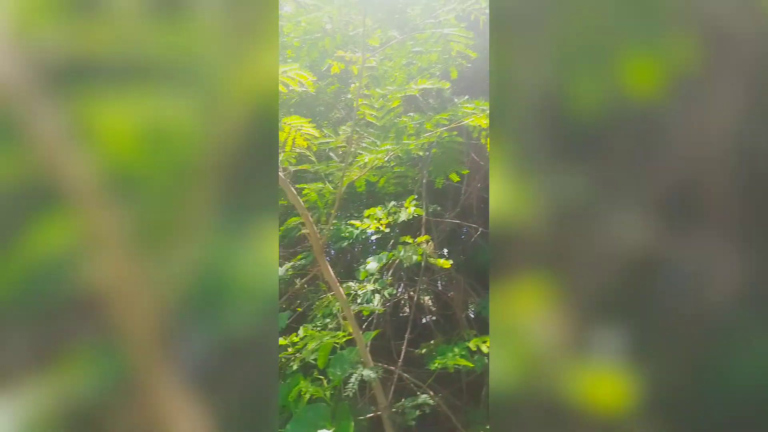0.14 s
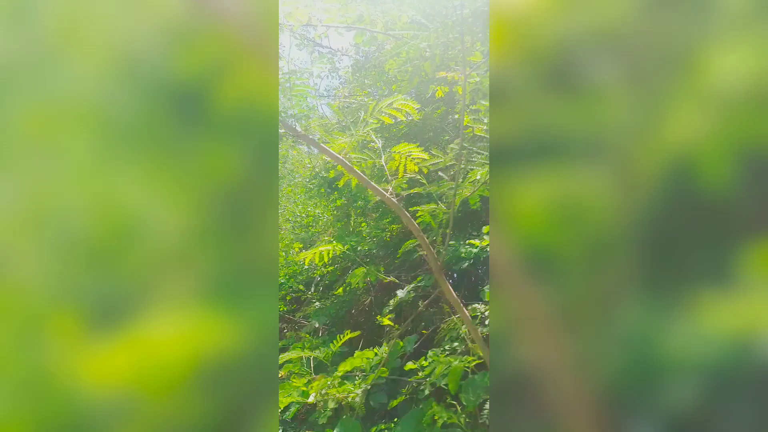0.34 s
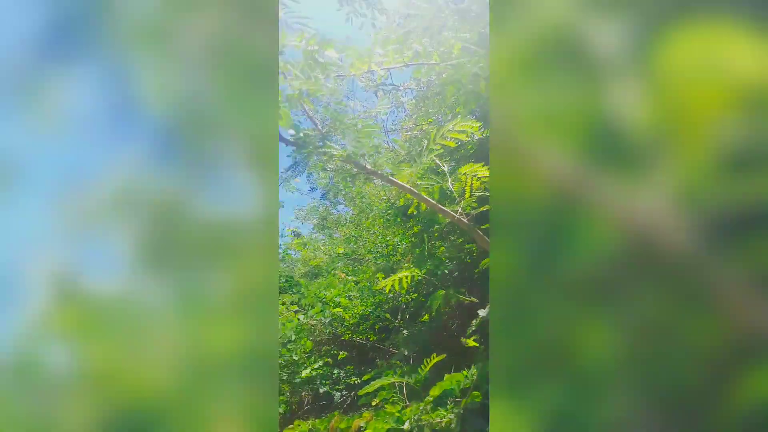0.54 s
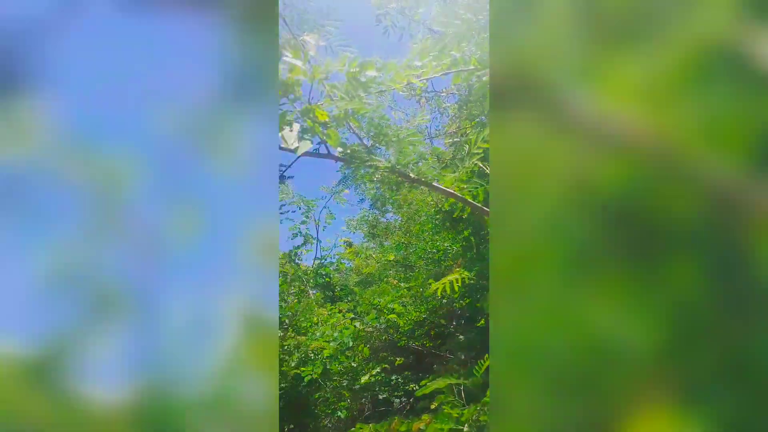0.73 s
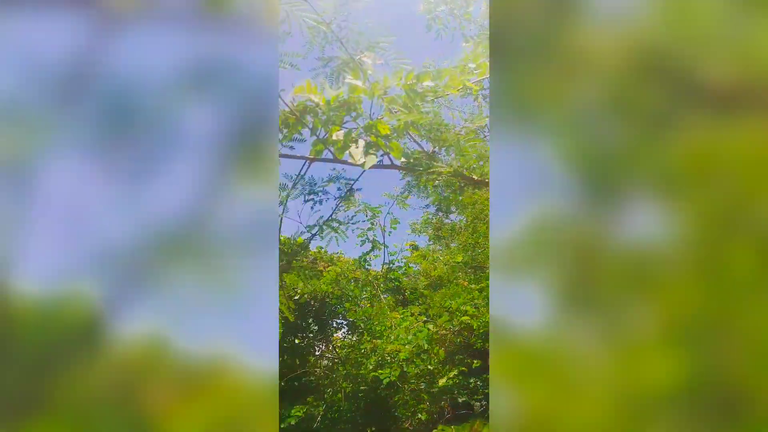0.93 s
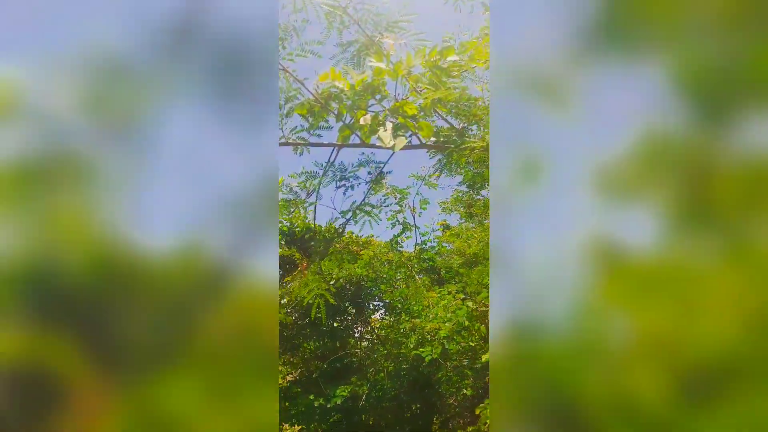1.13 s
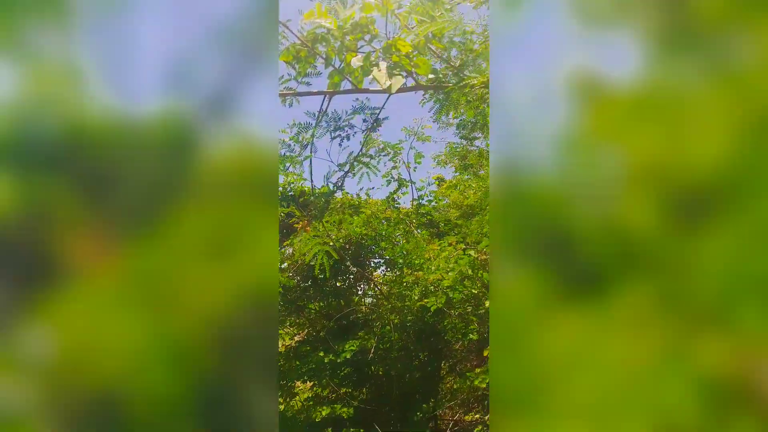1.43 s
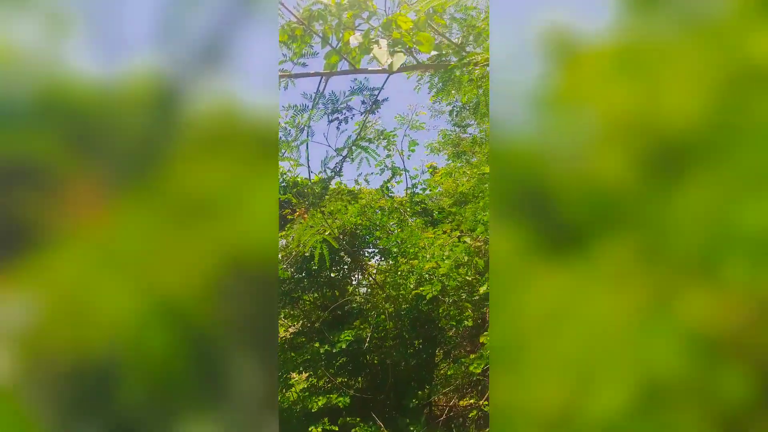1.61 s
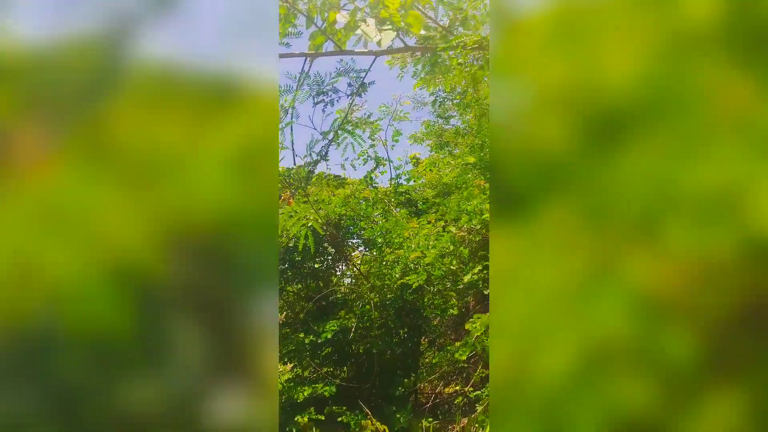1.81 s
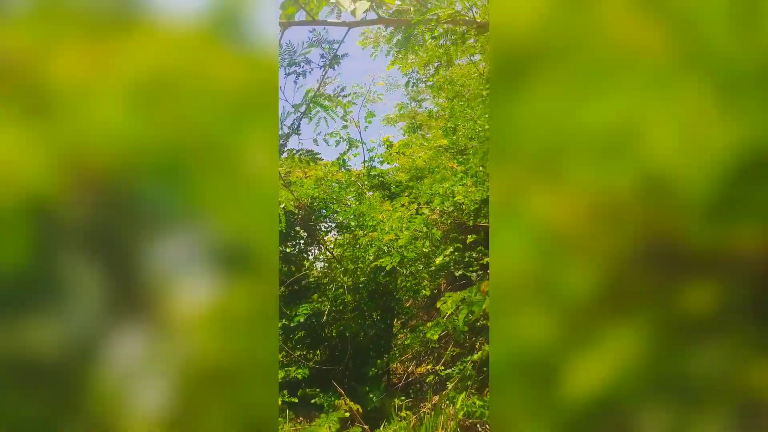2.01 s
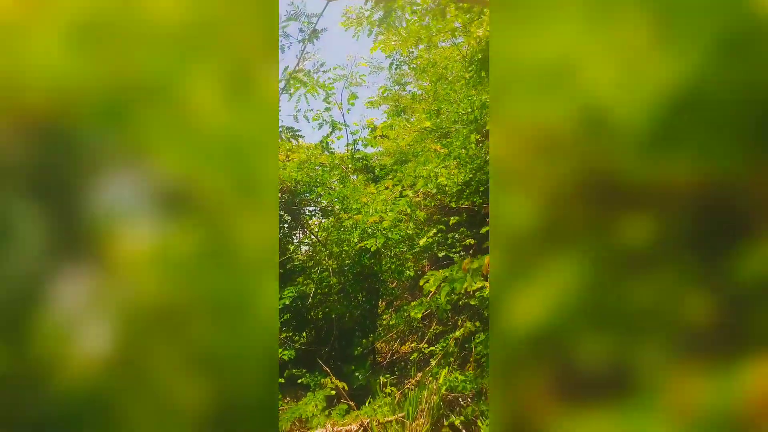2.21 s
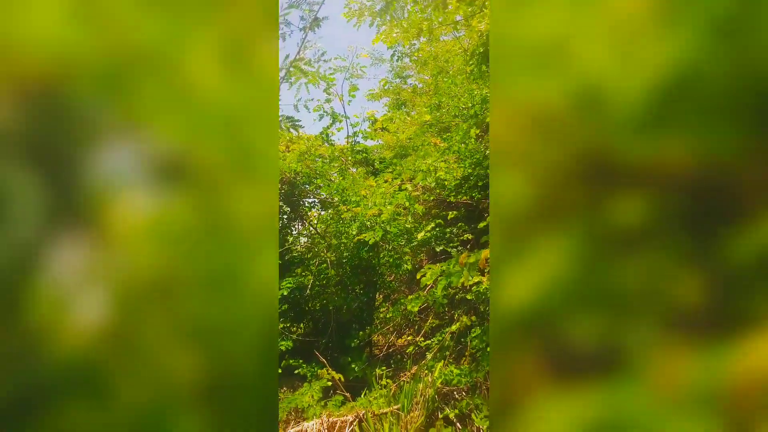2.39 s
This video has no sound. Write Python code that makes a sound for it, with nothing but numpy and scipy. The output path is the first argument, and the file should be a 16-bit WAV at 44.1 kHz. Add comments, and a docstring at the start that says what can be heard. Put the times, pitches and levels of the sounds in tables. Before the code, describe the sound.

Dry leaves rustle close by, faint at first, swelling from 0.2 seconds with bright, crackly sweeps until about 0.7. Twigs snap and knock woodenly from 0.4, sharpest around 0.55-0.65 and 0.8-0.85, again near 1.0. A softer, woodier rustle drags until 1.3. Thin leaf ticks scatter from 1.4 to 2.2, then only faint low traffic rumble remains. Dry, outdoors, almost mono.

```python
"""In dry brush, someone pushes through: leaves rustle in a few sweeps, twigs and leaves snap; far traffic behind.
Rustle is banded leaf-coloured noise plus dense crackle grains; snaps are short noise cracks with a weak rattle,
and twigs also ring in three decaying sine modes. Traffic is coloured noise under three engine orders.
The two channels are nearly one, differing a little in colour."""
import sys
import numpy as np
from scipy import signal
from scipy.fft import rfft, irfft, next_fast_len
from scipy.io import wavfile
from scipy.ndimage import uniform_filter1d, map_coordinates

SR = 44100
rng = np.random.default_rng(int(sys.argv[2]) if len(sys.argv) > 2 else 0)


def digitize_waveform(pressure):
    """Quantize a signal to 16-bit integers and store it at the path in sys.argv[1].

    Rows of a 2-D input are taken as channels; values are limited to [-1, 1].
    """
    field = np.atleast_2d(pressure).T
    bounded = np.clip(field, -1, 1)
    quanta = np.round(bounded * 32767).astype(np.int16)
    wavfile.write(sys.argv[1], SR, quanta)


N = 112454

# Leaf noise bands, lowest to top: low edge f/Hz, high edge f/Hz
BANDS = [(300, 1200), (1200, 4300), (4300, 6300), (6300, 10000), (10000, 16500)]
RISE_S = 0.00035  # onset time constant of grains, cracks and knocks


def amp(db):
    """Amplitude ratio of a level in dB."""
    return 10 ** (np.asarray(db) / 20)


def unit(x):
    """Scale to rms 1 along time."""
    return x / np.sqrt(np.mean(x ** 2, -1, keepdims=True) + 1e-20)


def along(points, hz):
    """Interpolate (Hz, value) points on a log frequency axis."""
    f, v = np.transpose(points)
    return np.interp(np.log(hz + 1), np.log(f + 1), v)


def curves(rows):
    """One value per sample for each column after the time."""
    s, *cols = np.transpose(rows)
    t = np.arange(N) / SR
    return [np.interp(t, s, c) for c in cols]


def wobble(knots_per_s):
    """Smooth random curve: a spline through normal random knots."""
    knots = rng.standard_normal(int(N * knots_per_s / SR) + 4)
    return map_coordinates(knots, [np.arange(N) * knots_per_s / SR])


def filtered(x, response):
    """Multiply the spectrum of x by a response of frequency."""
    m = next_fast_len(N + 8192)
    return irfft(rfft(x, m) * response(np.fft.rfftfreq(m, 1 / SR)), m)[..., :N]


def leafy():
    """Leaf-coloured noise, one independent row per band, each of rms 1."""
    # Leaf spectrum, relative: f/Hz, level/dB
    leaves = [(240, -50.5), (400, -36), (800, -18.5), (1300, -16), (1900, -10.5), (2500, -14.5),
              (4000, -11), (5100, -3), (7250, 2.5), (8600, 2.5), (9900, -2), (12300, 4.5), (14900, 2),
              (16000, -11.5)]
    noise = filtered(rng.standard_normal((len(BANDS), N)), lambda hz: amp(along(leaves, hz)))
    rows = []
    for edges_hz, row in zip(BANDS, noise):
        sos = signal.butter(3, edges_hz, "band", fs=SR, output="sos")
        rows.append(signal.sosfilt(sos, row))
    return unit(np.array(rows))


def bursts(times_s, gains, t60_s):
    """Envelopes per band: a sharp rise and exponential decay at each time, overlaps adding in power."""
    at = (times_s * SR).astype(int)
    kicks = np.array([np.bincount(at, g ** 2, N)[:N] for g in gains.T])
    t = np.arange(SR // 5) / SR
    power = (amp(-60 * t / t60_s) * (1 - np.exp(-t / RISE_S))) ** 2
    return np.sqrt(np.abs(signal.fftconvolve(kicks, power[None], axes=1)[:, :N]))


def rustle():
    """Rubbing leaves: smooth hiss, each band wavering, with dense crackle grains, swelling with each sweep."""
    # Sweeps before band trims: t/s, level/dB, middle band re level/dB, two low bands re level/dB
    sweeps = [(0, -52.5, -22, -24), (.08, -56.5, -8, -26), (.17, -51.5, -22, -28),
              (.21, -41.5, -7.5, -24.5), (.26, -38.5, -6.5, -24), (.31, -37, -6, -22.5),
              (.345, -47, -5, -20.5), (.37, -47, -9, -24), (.39, -39, -9, -26.5), (.44, -40, -7, -18.5),
              (.5, -36.5, -10.5, -16), (.57, -39, -5, -12.5), (.65, -43, -19, -13), (.75, -50, -11, -15.5),
              (.81, -48, -8, -14.5), (.9, -51, -21, -14.5), (.96, -52.5, -11, -19.5),
              (.99, -45, -14, -11.5), (1.08, -46, -5.5, -17.5), (1.2, -44, -9, -13.5),
              (1.28, -48, -23, -15), (1.33, -57.5, -12, -17.5), (1.42, -56, -16, -23), (1.6, -56, -27, -21),
              (1.74, -56.5, -25, -17), (1.78, -56.5, -3.5, -18), (1.84, -63, -8, -24),
              (1.93, -61.5, -14.5, -21), (2.08, -69.5, -23, -26), (2.2, -82.5, -8, -12)]
    # Lowest-band change, lifted while stems drag: t/s, level/dB
    woody = [(.9, -2), (1.0, 3.5), (1.25, 5.5), (1.4, 3.5)]
    # Trim of each band, lowest to top: level/dB
    band_trim_db = np.array([-8.5, 3.5, -7, -8, -5])[:, None]
    grains_per_s, grain_t60_s, grain_db = 700, .003, 1
    spread_db, colour_sd_db = 3.5, 3  # exponential size scale; independent balance of bands
    flutter_sd_db = 1.3

    draw = rng.random((int(grains_per_s * N / SR), 2))
    size_db = -spread_db * np.log(draw[:, 1:] + 1 / 100)
    colour_db = colour_sd_db * rng.standard_normal((len(draw), len(BANDS)))
    grains = unit(bursts(draw[:, 0] * N / SR, amp(size_db + colour_db), grain_t60_s))
    flutter_db = flutter_sd_db * np.array([wobble(30) for _ in BANDS])
    hiss = leafy() * amp(flutter_db)
    crackle = amp(grain_db) * grains * leafy()

    level_db, middle_db, low_db = curves(sweeps)
    flat_db = np.zeros(N)
    share_db = np.array([low_db + curves(woody)[0], low_db, middle_db, flat_db, flat_db])
    return (amp(level_db + share_db + band_trim_db) * (hiss + crackle)).sum(0)


def snaps():
    """Twigs knock in three modes, leaves only tick; both crack as noise and then rattle weakly."""
    # Twigs, levels before the crack and knock gains: t/s, t60/ms, knock f/Hz, knock level/dB,
    # overtone f/Hz, overtone level/dB, crack middle level/dB, crack high level/dB, crack top level/dB
    twigs = [(.4308, 13, 1610, -55, 2640, -57, -44, -43, -45.5),
             (0.4933, 22, 2550, -48, 1700, -49, -46.5, -33, -35.5),
             (.4969, 5, 2540, -41, 3600, -54, -37, -36, -41),
             (.5283, 4, 2200, -58, 3350, -47, -48, -44, -47),
             (.5406, 3, 2200, -56, 3380, -47, -46, -27.5, -36),
             (0.5519, 7, 2250, -34, 3480, -42, -49, -30, -40),
             (0.5792, 8, 2230, -30, 3420, -60, -41, -33, -40.5),
             (0.5883, 5, 1040, -47, 1800, -48, -46, -40, -50),
             (0.619, 8, 2000, -52, 2830, -44, -49, -45, -43),
             (0.6246, 5, 2310, -41, 3600, -58, -38, -45, -50),
             (0.637, 6, 2050, -36, 3050, -33, -41, -34, -47),
             (.76, 12, 1840, -46, 3020, -56, -53, -46, -40.5),
             (0.782, 10, 1984, -34, 1210, -65, -30, -29.5, -21.5),
             (0.7863, 9.7, 1786, -32.5, 3026, -31.5, -38.5, -35, -33),
             (0.8537, 10, 1680, -42, 2930, -42, -36, -33, -27),
             (.9765, 9, 1130, -37.5, 1610, -38.5, -38.5, -34.5, -35),
             (1.0307, 20, 1640, -47, 2900, -63, -52, -46, -44),
             (1.0346, 7, 1070, -46, 4200, -45, -59, -52, -52),
             (1.137, 16, 1500, -54, 2690, -57, -53, -49, -51),
             (1.1432, 8, 1300, -46, 3670, -46, -43, -39.5, -45),
             (1.163, 6, 1200, -52.5, 2700, -60, -46, -48, -55),
             (1.19, 6, 1310, -55, 3500, -58, -58, -55, -54.5),
             (1.197, 6, 1180, -52, 4000, -47.5, -59, -59, -44.5),
             (1.2175, 8, 905, -45.5, 1420, -40.5, -53, -50, -42.5),
             (1.2391, 5, 960, -52.5, 2920, -46.5, -43, -43.5, -42.5),
             (1.2467, 4, 1900, -57, 3450, -43, -60, -49, -39),
             (1.3009, 2.5, 1490, -51, 3780, -48.5, -45.5, -40.5, -28.5),
             (1.7604, 12.4, 1880, -57.5, 2700, -60.5, -62, -55, -47)]
    # Leaf ticks, levels before the crack gain: t/s, t60/ms, middle level/dB, high level/dB, top level/dB
    ticks = [(0.0249, 3.7, -79, -45, -56), (0.1355, 8.1, -82, -43, -63), (0.2525, 20, -58, -44, -48),
             (0.2942, 27, -47.5, -37, -35.5), (0.324, 13, -49, -44, -42), (0.3897, 12, -55, -40.5, -44),
             (0.4667, 4.9, -43, -33, -42), (0.6866, 4.3, -51, -39, -49), (.7239, 4, -54, -45, -42),
             (.8388, 7, -68, -52, -62), (1.2598, 8, -58, -49, -40.5), (1.27, 5, -53, -53, -48),
             (1.2906, 11, -58, -53, -44), (1.4026, 2.55, -75, -47, -39), (1.4203, 21, -67, -73, -47.5),
             (1.5953, 3.6, -62, -62, -58), (1.6036, 4.4, -54, -43.5, -46), (1.619, 3, -71, -54, -52.5),
             (1.645, 4, -54.5, -51, -43.5), (1.6553, 6.6, -64, -47.5, -45), (1.6918, 3, -82, -56, -44),
             (1.7308, 3, -67, -55, -40), (1.738, 7.5, -67, -50, -44), (1.7727, 3.7, -73, -55, -50.5),
             (1.7903, 2.7, -55, -57, -56), (1.8163, 7.2, -63, -58, -54), (1.8723, 8, -64, -63, -58.5),
             (2.0312, 4.3, -85, -66, -55.5), (2.078, 3, -93, -61, -51), (2.215, 5.3, -72, -65.5, -73.5)]
    # Two low bands of a tick re its middle band: level/dB
    tick_low_db = [-20, -8]
    # Twig noise in the two low bands re its modes: level/dB
    knock_noise_db = [-5, -3.5]
    crack_db, knock_db = 9, 10
    thud_db_per_oct = 7.5  # lower knocks carry more of the lowest band
    undertone_ratio, undertone_db = 0.55, -5.5  # lowest mode re knock pitch; re lowest noise band
    rattle_t60_s, rattle_db = 0.087, -17  # leaves shaking after a snap

    s, t60_ms, hz, low_db, over_hz, over_db, *treble_db = np.transpose(twigs)
    thud_db = low_db + knock_noise_db[0] - thud_db_per_oct * np.log2(hz / 1000)
    twig_db = [thud_db, np.maximum(low_db, over_db) + knock_noise_db[1], *treble_db]
    tick_s, tick_ms, *tick_db = np.transpose(ticks)
    tick_db = [tick_db[0] + tick_low_db[0], tick_db[0] + tick_low_db[1], *tick_db]
    times_s = np.r_[s, tick_s]
    t60_s = np.r_[t60_ms, tick_ms][:, None] / 1000
    gains = amp(np.c_[twig_db, tick_db].T + crack_db)

    t = np.arange(SR // 40) / SR
    at = (times_s * SR).astype(int)[:, None] + np.arange(len(t))
    decay = amp(-60 * t / t60_s) * (1 - np.exp(-t / RISE_S))
    fall = decay * np.sqrt(.01 / t60_s)  # short ones peak higher
    power = [np.bincount(at.ravel(), (g[:, None] * fall).ravel() ** 2, N)[:N] for g in gains.T]
    noise = leafy()
    even = noise / np.sqrt(np.abs(uniform_filter1d(noise ** 2, size=40, axis=1)) + 1 / 20)
    cracks = np.sqrt(power) * even
    rattle = amp(rattle_db) * bursts(times_s, gains, rattle_t60_s) * leafy()

    modes = [(hz, low_db), (over_hz, over_db), (undertone_ratio * hz, thud_db + undertone_db)]
    rings = 0
    for f, db in modes:
        rings = rings + amp(db[:, None] + knock_db) * np.sin(2 * np.pi * f[:, None] * t)
    rings = rings * fall[:len(s)]
    knocks = np.bincount(at[:len(s)].ravel(), rings.ravel(), N)[:N]
    return (cracks + rattle).sum(0) + knocks


def traffic():
    """Steady far rumble and hiss with the low orders of an idling engine, pitch and levels wavering."""
    # Rumble and hiss spectrum, relative: f/Hz, level/dB
    air = [(25, -40.5), (45, -20), (60, -16.5), (100, -10), (150, -10), (185, -18), (200, -21.5),
           (290, -21), (340, -29), (640, -33.5), (1000, -29), (1330, -36), (1700, -27.5), (2280, -43),
           (5280, -47.5), (16000, -55)]
    # Engine: t/s, cycle f/Hz, then one mean rms level/dB per order
    engine = [(0, 13.7, -69, -57.5, -62.5), (.6, 14.4, -58.5, -68, -62), (1.2, 13.8, -64, -59, -63.5),
              (1.7, 13.8, -60, -84, -54.5), (2.1, 13.1, -59.5, -67, -57.5), (2.55, 14.4, -76, -55.5, -67.5)]
    # Multiples of the cycle frequency
    orders = [5, 6, 7]
    bed_db, waver_sd_db, pitch_waver_hz = -60.5, 2, 0.11

    hz, *levels_db = curves(engine)
    turn = 2 * np.pi * np.cumsum(hz + pitch_waver_hz * wobble(4.87)) / SR
    hum = np.zeros(N)
    for k, db in zip(orders, levels_db):
        gain = np.sqrt(2) * amp(db + waver_sd_db * wobble(8.48))
        hum += gain * np.sin(k * turn + 2 * np.pi * rng.random())
    bed = unit(filtered(rng.standard_normal(N), lambda f: amp(along(air, f))))
    return hum + amp(bed_db) * bed


def scene():
    """Sum the sources, the same in both channels."""
    x = rustle() + snaps() + traffic()
    return np.array([x, x])


def record(dry):
    """Part the channels in a few bands, add faint opposed hiss; treble steps down, then ends."""
    # Gaussian bands of channel difference: centre f/Hz, width f/Hz, level/dB, phase/rad
    apart = [(1838, 284, -8, 0.52), (9700, 590, -9.5, 2.1), (900, 250, -39, 0.26)]
    hiss_db = -90
    roll_hz, roll_db, top_hz = 15450, -29, 16750

    def difference(f):
        return sum(amp(db) * np.exp(1j * rad - ((f - hz) / w) ** 2) for hz, w, db, rad in apart)

    side = filtered(dry[0], difference)
    side = side + amp(hiss_db) * rng.standard_normal(N)
    pair = dry + np.array([side, -side])
    return filtered(pair, lambda hz: np.where(hz < roll_hz, 1, amp(roll_db)) * (hz < top_hz))


dry = scene()
out = record(dry)
digitize_waveform(out)
```